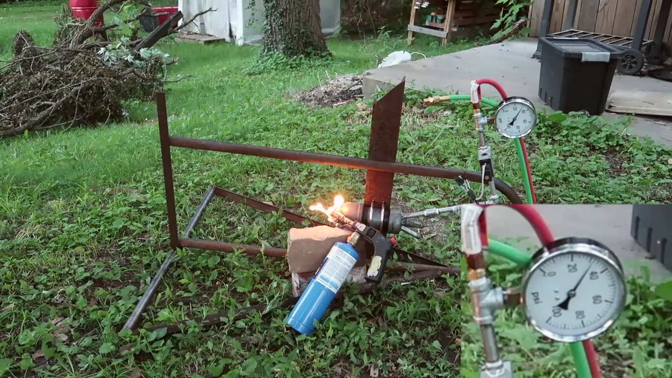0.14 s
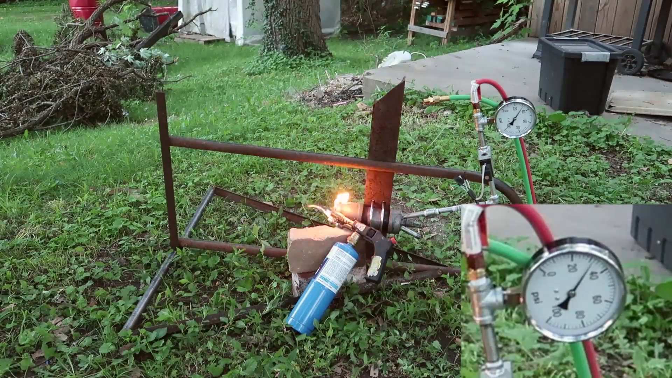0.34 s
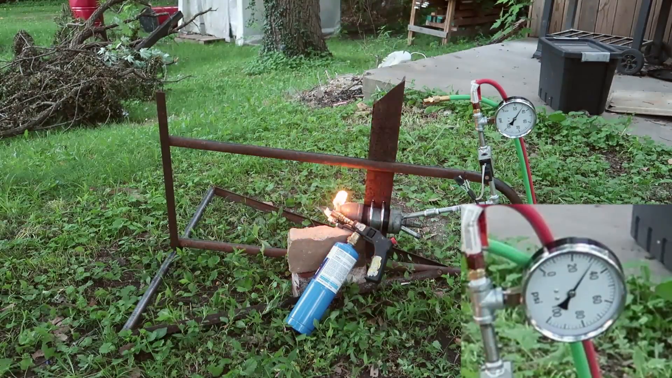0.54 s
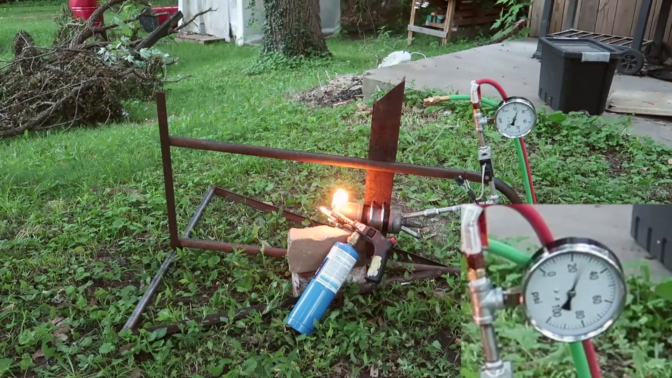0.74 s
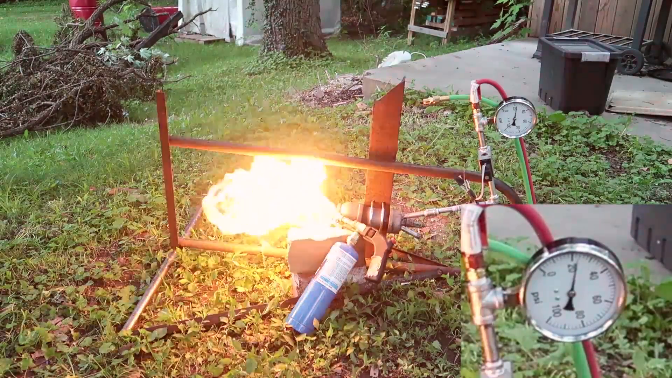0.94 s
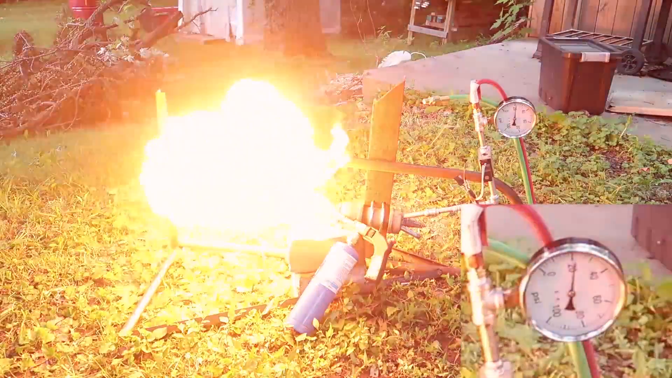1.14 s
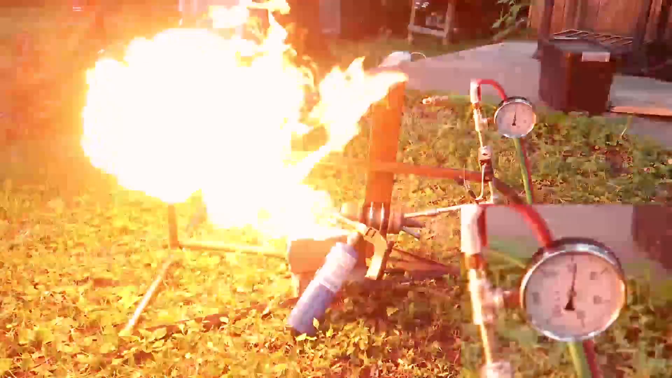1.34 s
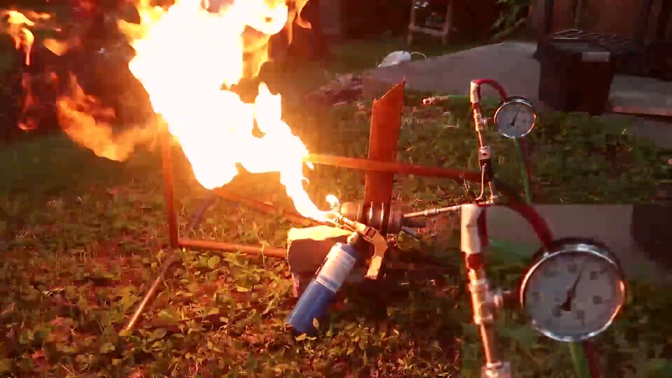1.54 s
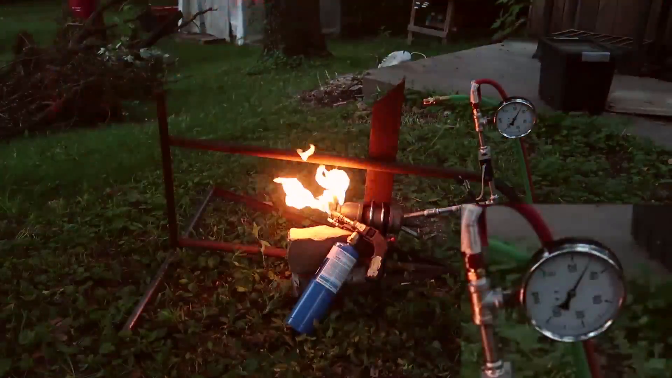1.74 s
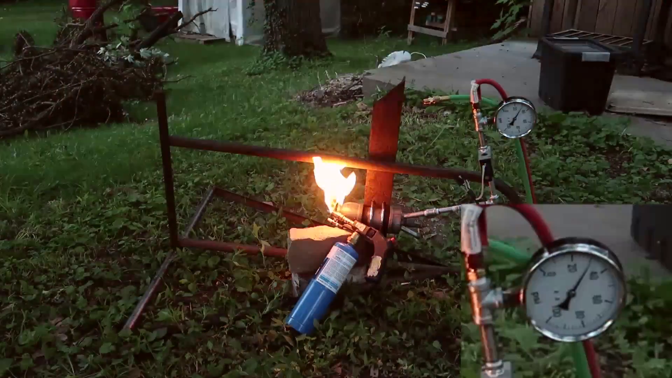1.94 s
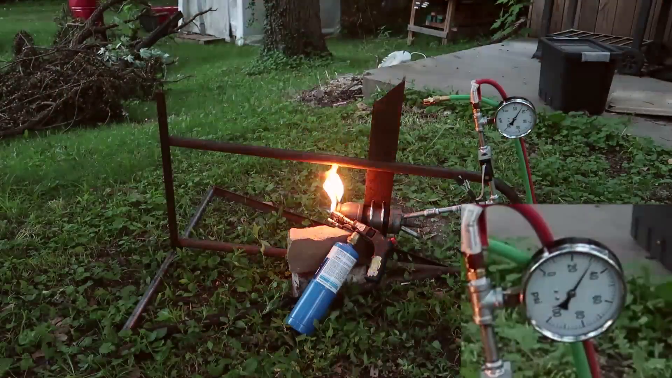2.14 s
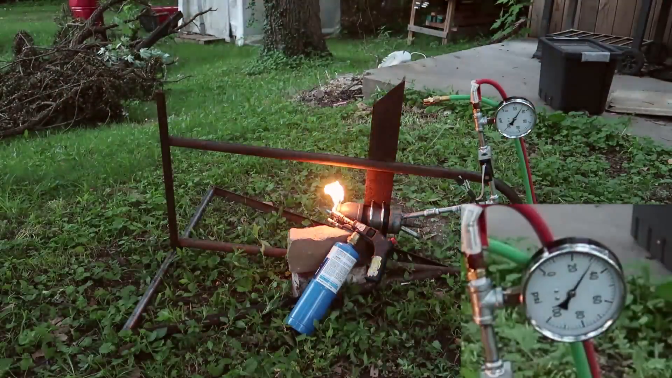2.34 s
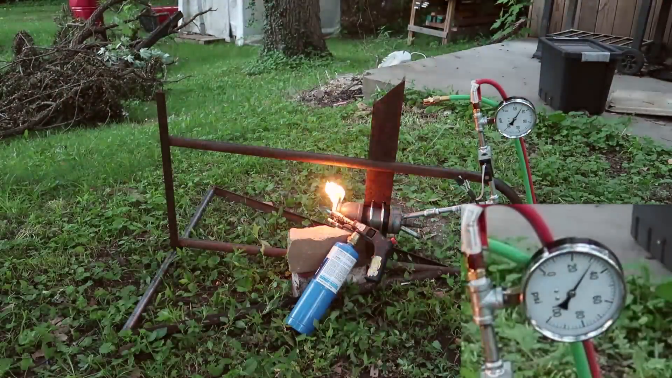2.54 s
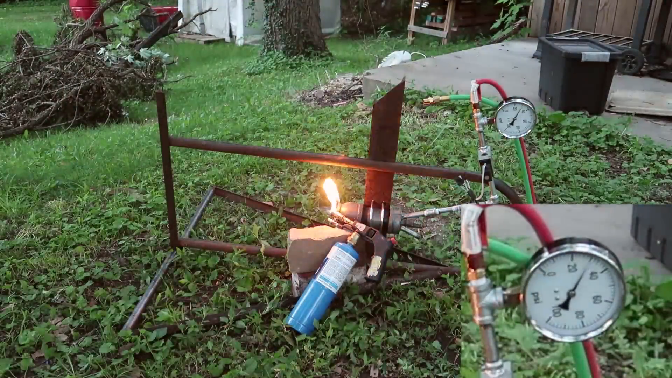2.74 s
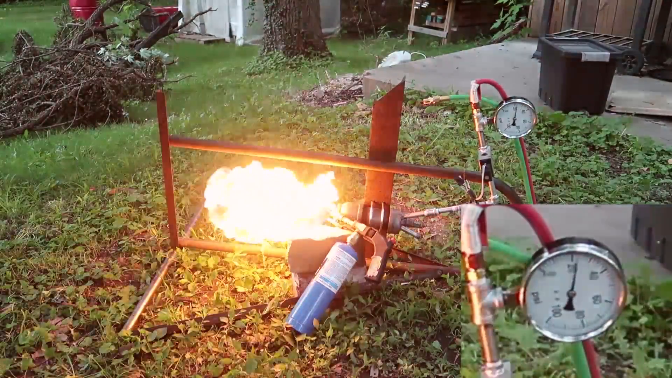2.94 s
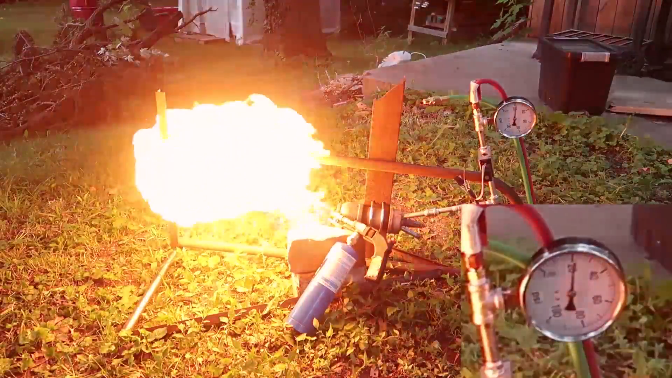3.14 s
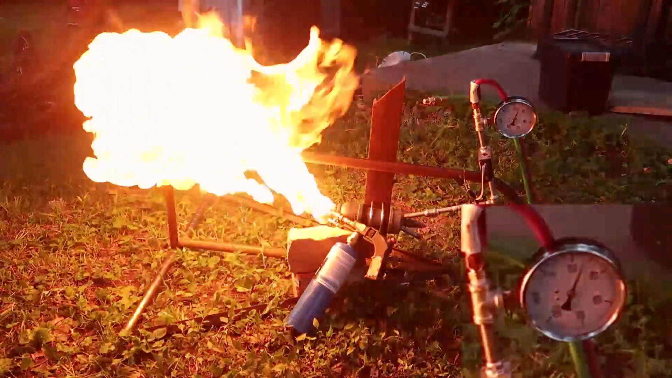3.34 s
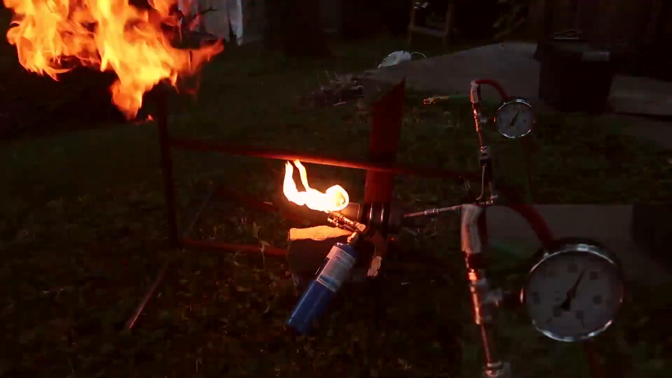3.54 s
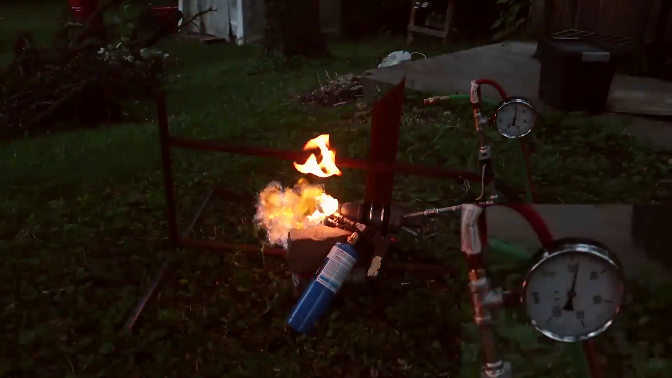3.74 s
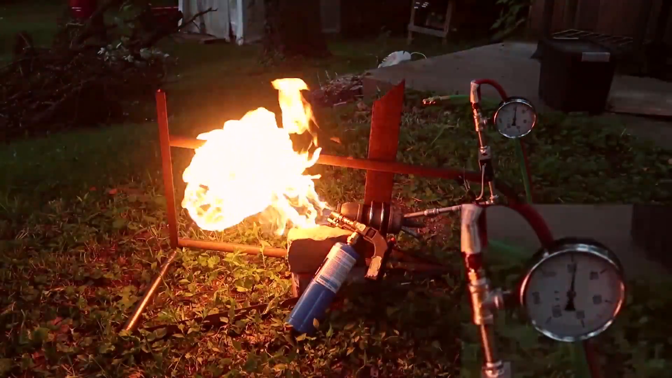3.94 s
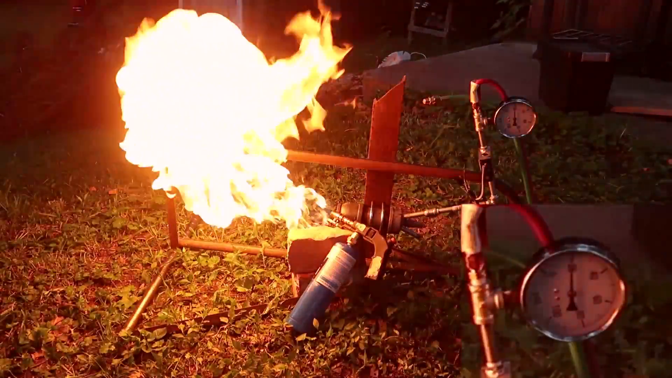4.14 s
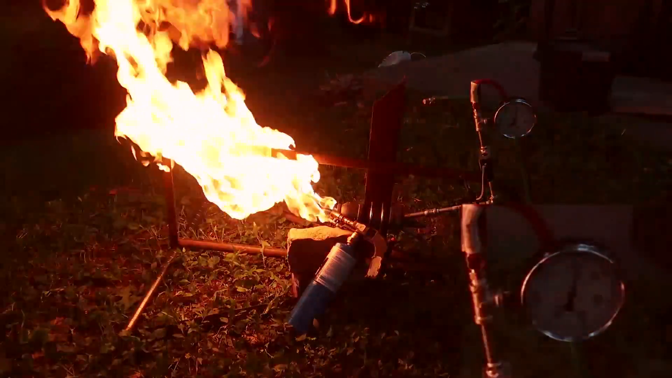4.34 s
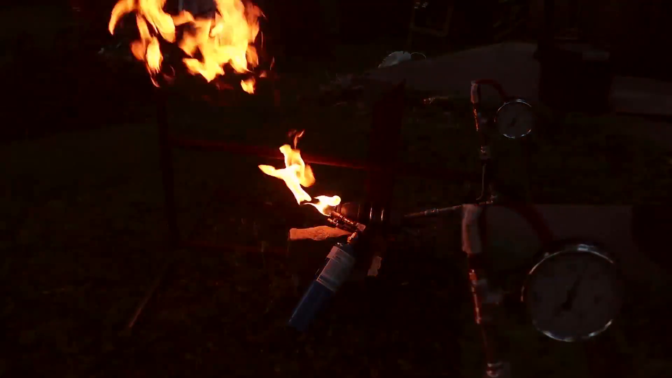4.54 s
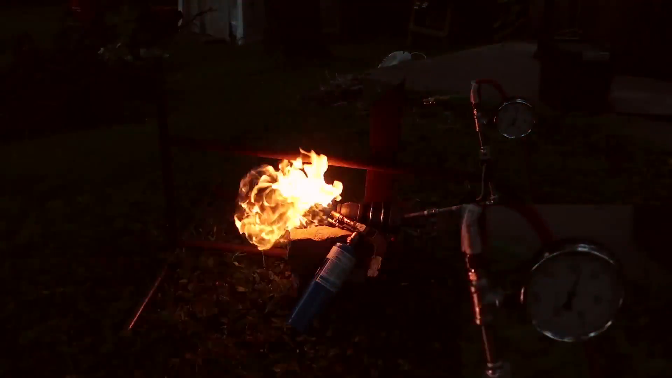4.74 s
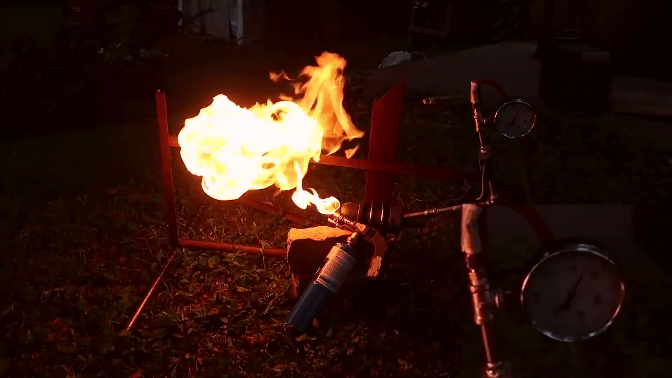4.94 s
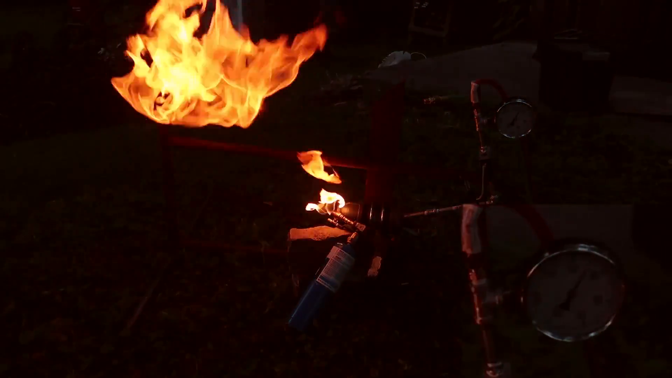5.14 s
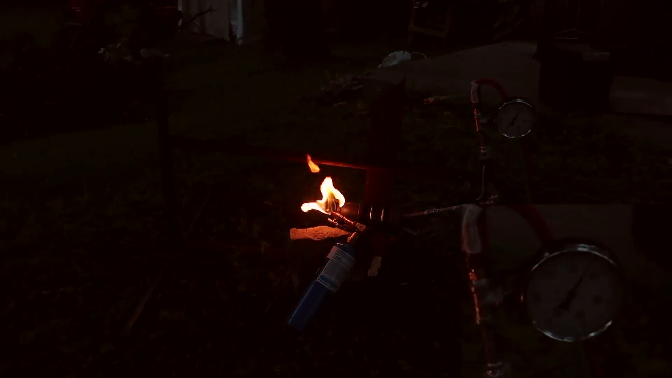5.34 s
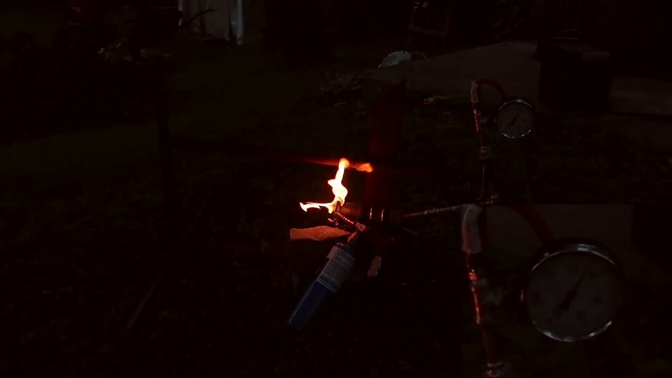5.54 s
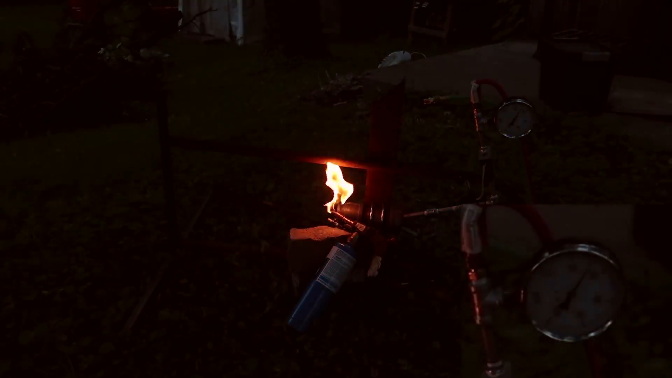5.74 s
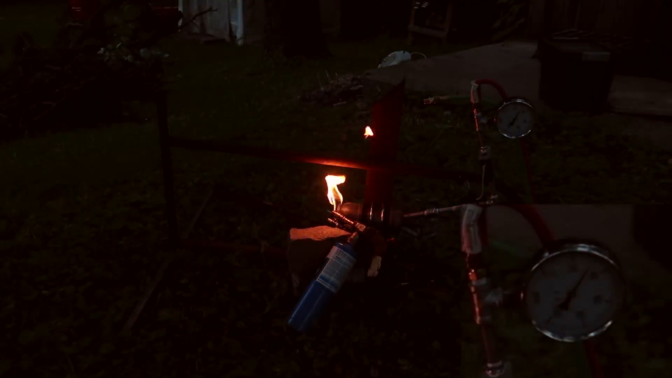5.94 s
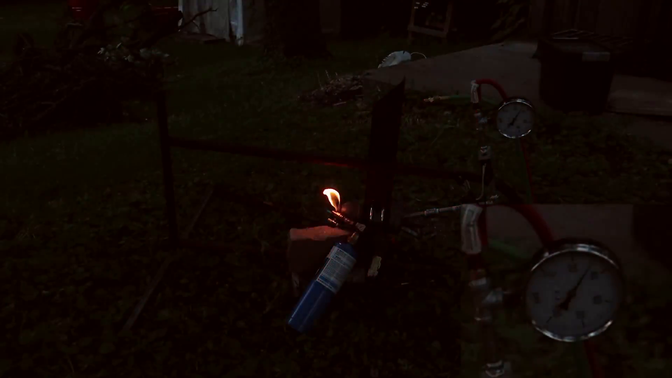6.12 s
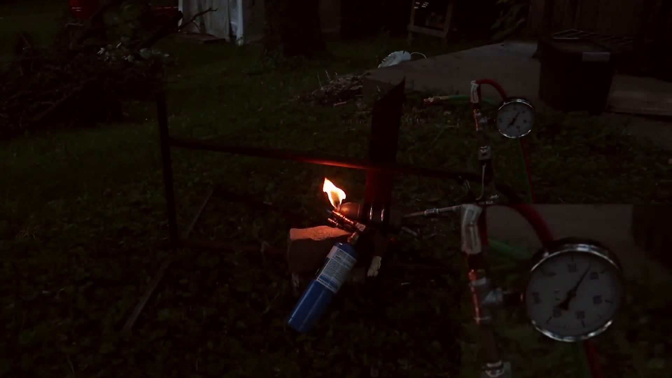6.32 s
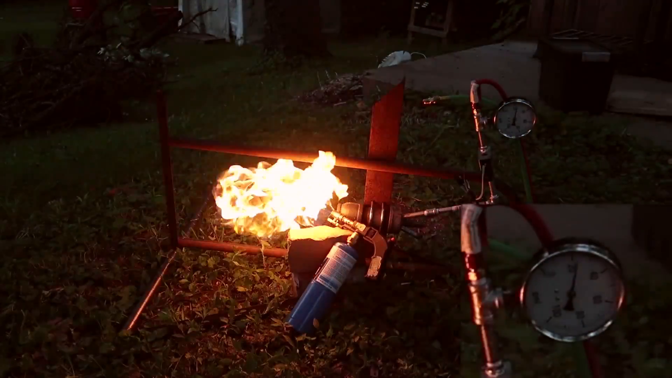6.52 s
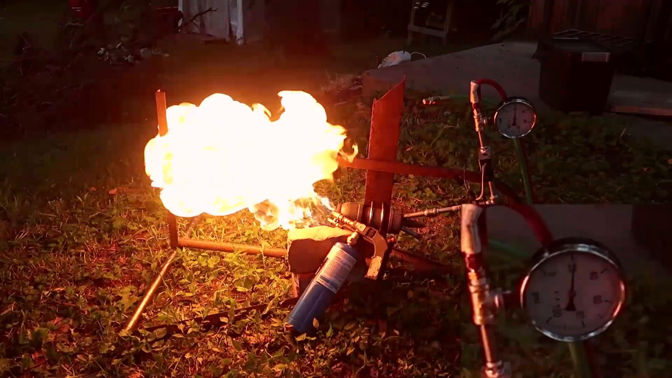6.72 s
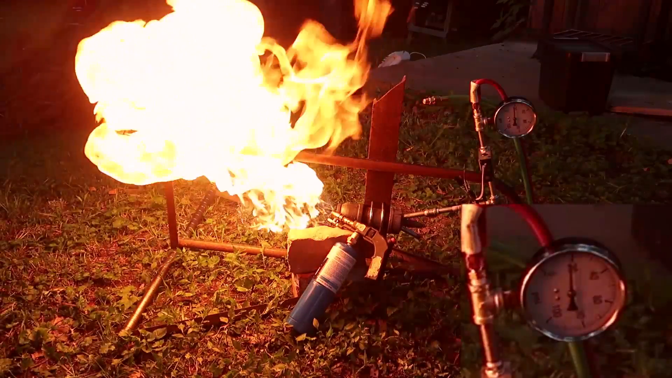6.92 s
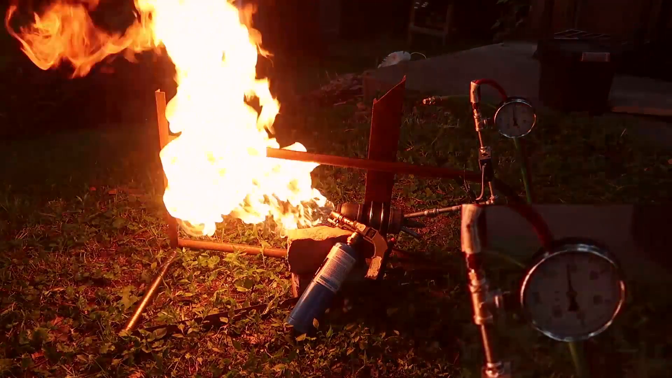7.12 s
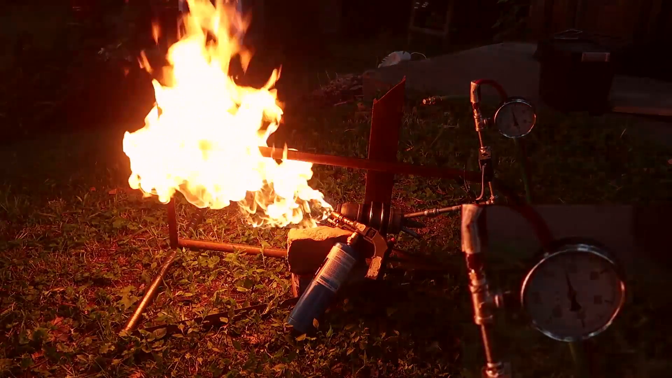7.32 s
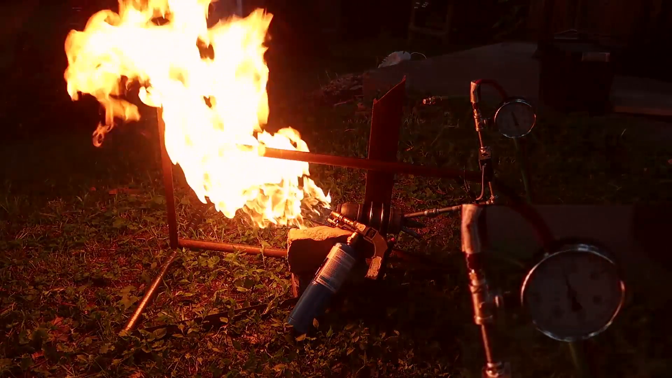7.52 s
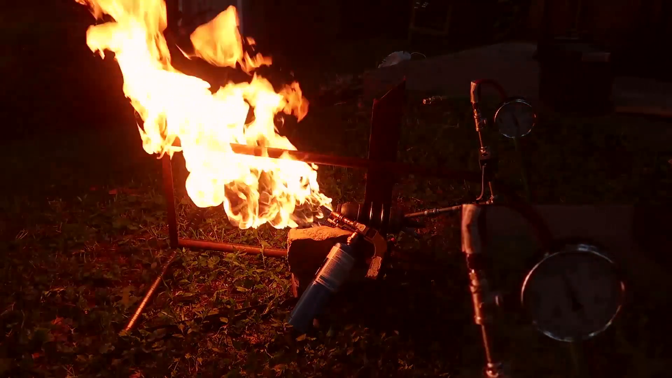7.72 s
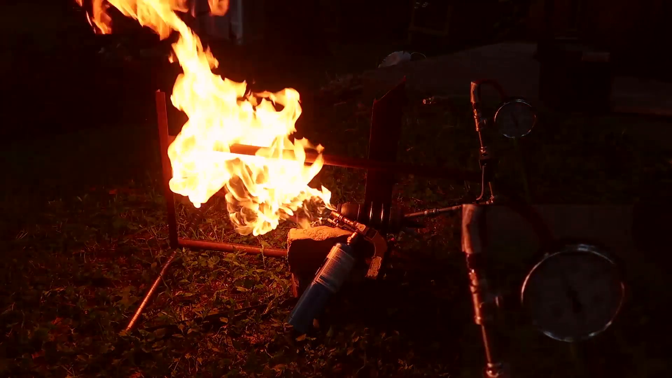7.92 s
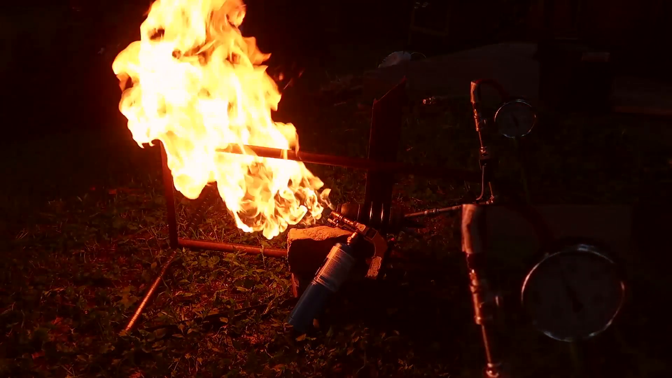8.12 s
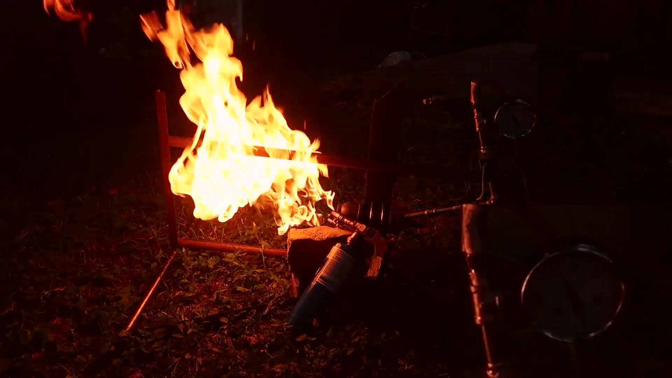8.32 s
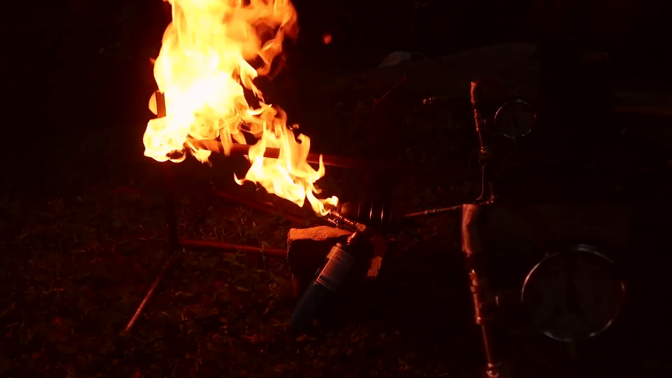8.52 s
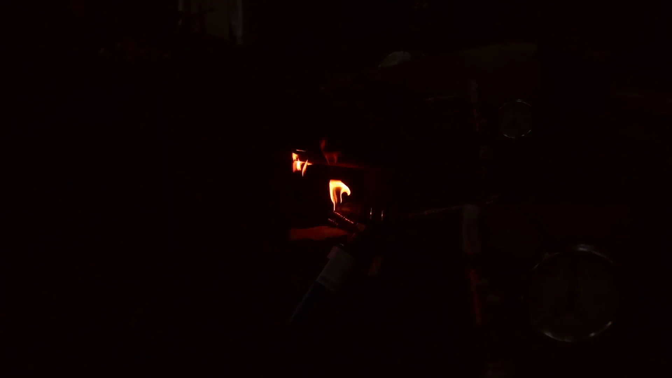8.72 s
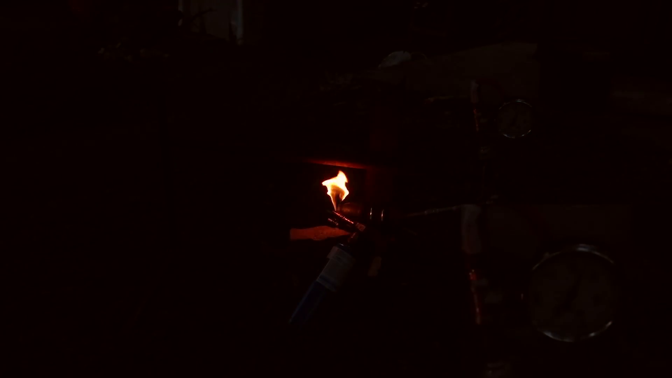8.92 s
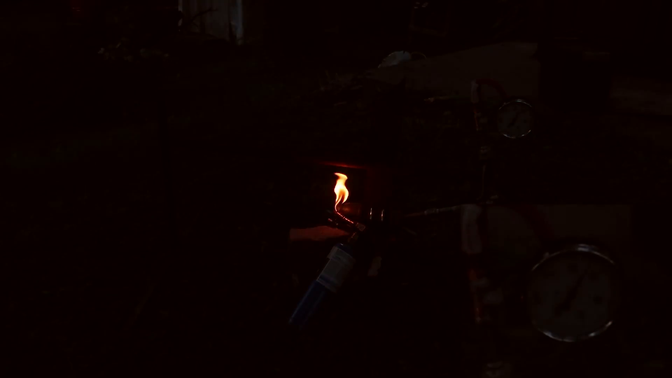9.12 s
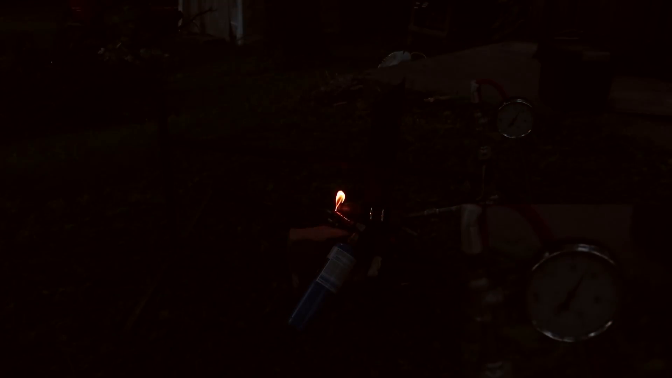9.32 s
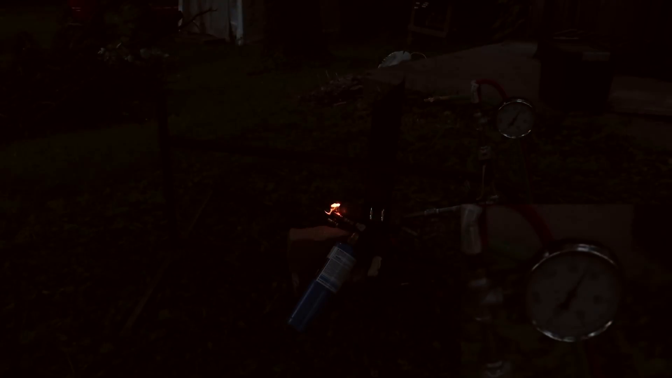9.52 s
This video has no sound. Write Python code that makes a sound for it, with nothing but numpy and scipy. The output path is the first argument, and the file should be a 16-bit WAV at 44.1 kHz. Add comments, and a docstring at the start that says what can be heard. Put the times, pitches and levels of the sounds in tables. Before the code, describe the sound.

A valve clicks and releases five shrill, hissing gas jets that boom into roaring fireballs, each ending in a loud pop, with faint birds around.

```python
"""A solenoid valve lets five bursts of propane, the fourth very short, through a pipe past a pilot flame in a yard.
First the pilot flame flutters in open air while birds whistle and a thin whine sounds far away.
In each burst the valve clicks as struck modes, and turbulent noise hisses and drives the pipe's resonances.
Then the cloud ignites with a boom of low noise and roars; when the valve shuts, a rising chirp makes the pop.
Near the end insects trill and a light knock falls; scattered echoes follow the sounds of the rig and the wildlife."""
import sys
import numpy as np
from scipy import signal
from scipy.fft import rfft, irfft
from scipy.io import wavfile
from scipy.ndimage import uniform_filter1d

SR = 44100
rng = np.random.default_rng(int(sys.argv[2]) if len(sys.argv) > 2 else 0)


def wrap_up_sound(samples):
    """Save the sound to the file named by the first command line argument, as 16-bit audio."""
    columns = np.atleast_2d(samples).T
    # keep every value between -1 and 1, then stretch to whole-number steps
    tamed = np.clip(columns, -1, 1)
    steps = np.round(tamed * 32767).astype(np.int16)
    wavfile.write(sys.argv[1], SR, steps)


N = 426447
TIME = np.arange(N) / SR

# Bursts of gas. Each row: valve opening in seconds, click level in dB, jet level in dB, boom level in dB,
# delay to ignition in seconds, starting pitch of the main whistle in Hz, time to fill the pipe in seconds.
BURSTS = [(0.8316, -28, -30, -24.5, 0.14, 1908, .22), (2.8387, -24.5, -29, -20, .13, 1866, 0.29),
          (3.7485, -25, -30, -21, 0.12, 1838, 0.25), (4.6808, -25.5, -29.5, -22.5, 0.12, 1858, .2),
          (6.4309, -25.5, -29.5, -21.5, 0.13, 1868, .19)]
OPEN_S, CLICK_DB, JET_DB, BOOM_DB, IGNITE_S, START_HZ, FILL_S = np.transpose(BURSTS)
# Closings of the valve. Each row: time in seconds, peak level of the pop's push in dB.
SHUTS = [(1.411, -3), (3.2767, -3), (4.2971, -4), (4.8021, -3.5), (8.4675, -5.5)]
# Humming modes of the gas-filled pipe. Each row: frequency in Hz, width in Hz, relative level in dB.
PIPE_MODES = [(354, 31.6, -1), (830, 217, -5.5), (2338, 59, -17.5), (3010, 170, -12), (4265, 67, -6.5),
              (6750, 43, -21)]
# The two microphone ports, for sound from the rig and for sound from all around.
# Each row: frequency in Hz, correlation of the ports (-1 to 1), phase lead of the left in radians.
NEAR_PORTS = [(100, 1, 0), (3000, 1, 0), (3600, .93, -.1), (4600, .92, -.1), (5300, .76, -.5),
              (8200, .64, -.6), (9700, .55, -1.1), (10900, .55, -3.9), (12700, .68, -4.6),
              (14600, .65, -6.1)]
DIFFUSE_PORTS = [(108, 1, 0), (278, 0.96, 0), (504, 0.65, 0), (870, 0.87, 0), (1600, 0.69, 0),
                 (3000, 0.56, 0), (4900, 0.16, 0), (5230, -0.64, 0), (7000, -0.94, 0), (8500, -0.64, 0),
                 (11000, -0.66, 0)]


def jet(flutter_db=0.87, front_db=-19, front_delay=0.021, front_t60=0.025):
    """Impulse and flow excitation: a gas front thumps the lowest pipe mode; then the jet hisses and the pipe sings."""
    front = np.zeros(N)
    t = np.arange(SR // 10) / SR
    lowest_hz = PIPE_MODES[0][0]
    for s in OPEN_S:
        add(front, s + front_delay, ring([(lowest_hz, front_db, front_t60)], t))
    burst = line()[0]
    level_db = JET_DB[burst] + flutter_db * wander(23)
    return front + amp(level_db) * (song() + hiss())


def song(hum_db=-2.1, hum_per_db=0.25, steeper=0.38, flutter_db=1.0, waver=0.00488):
    """Pipe resonance: modes sink as heavy, cold gas slows sound in the pipe; among the hums, higher modes fade more."""
    # Whistling modes. Each row: frequency in Hz, width in Hz, relative level in dB.
    whistles = [(1028, 50, 0.046), (1793, 44, 0.071), (2783, 60, -1.36), (3516, 73, 0.65)]
    # Answer of each whistle to the jet; the second fades most as pressure falls. Each row: relative level
    # at first in dB, relative level with the pipe full in dB, dB per dB of line pressure.
    voicing = [(-.5, 0, 0.58), (-3.5, -0.5, 1.7), (0, -5.5, 0.65), (-5.5, -3, 1.04)]
    # Swells of the whistles. Each row: centre in seconds, length in seconds, number of the whistle, gain in dB.
    # The number is rounded; only 0 to 3 name a whistle, and other rows sound nothing.
    surges = [(1.01, 0.14, 3, 7.5), (1.033, 0.2, 2, 6), (2.88, 0.076, 0, 4), (2.893, 0.068, 3, 6.5),
              (2.915, .06, 3.5, 9), (3.113, 0.12, 2.5, 5.5), (4.118, 0.074, 1, 6), (4.244, .14, 3, 8),
              (4.774, .07, 5, 12), (6.513, 0.068, 1.5, 5), (6.698, .12, 2.5, 4), (6.997, 0.13, 7, 0),
              (7.21, 0.097, 3.5, 8.5), (7.26, 0.16, 2, 2.5), (7.305, 0.043, 0.5, 6), (7.49, .5, 0, 5),
              (7.82, 0.087, 3, 5), (7.973, 0.37, 3, 8.5), (7.98, 0.41, 2, 7)]
    rest_hz = 1793  # pitch at which the modes have their listed frequencies
    full_hz, climb_hz_per_db = 1764.6, 8.5  # pitch with the pipe full, and its climb as the pressure sags
    falter_db, falter_after_s, falter_s = -2, 0.047, 0.098  # the disturbed jet dips just after ignition
    accent_db, accent_at_s, accent_s = 1.5, 0.037, 0.017  # brief accent as gas first reaches the mouth

    burst, age, pressure = line()
    air = np.exp(-(age / FILL_S[burst]) ** 2)  # share of air left in the pipe
    pitch = full_hz + air * (START_HZ[burst] - full_hz) - climb_hz_per_db * np.minimum(pressure, 0)
    sound_speed = pitch / rest_hz * (1 + waver * wander(25.1))  # relative to the speed at rest_hz
    out = np.zeros(N)
    for hz, width, db in PIPE_MODES:
        answer_db = hum_per_db * (hz / full_hz) ** steeper * pressure
        out += amp(hum_db + db + answer_db) * sing(hz * sound_speed, width)
    # four modes lock to the jet's eddies and whistle
    for k, ((hz, width, db), (first_db, full_db, per_db)) in enumerate(zip(whistles, voicing)):
        surge = sum(gain * bump(s, length) for s, length, which, gain in surges if round(which) == k)
        filling_db = air * first_db + (1 - air) * full_db
        strength = filling_db + per_db * pressure + surge + flutter_db * wander(7.5)
        out += amp(db + strength) * sing(hz * sound_speed, width)
    falter = falter_db * bump((OPEN_S + IGNITE_S)[burst] + falter_after_s, falter_s)
    accent = accent_db * bump(OPEN_S[burst] + accent_at_s, accent_s)
    return flow(delay=0.021, rise=0.014, drain=0.026) * amp(accent + falter) * out


def hiss(hiss_db=3.0, body_per_db=0.56, fizz_per_db=1.13, split_hz=3500):
    """Jet turbulence at the nozzle: the high band falls faster with pressure, so the hiss grows duller."""
    # Spectrum of the hiss. Each row: frequency in Hz, relative level in dB.
    hiss_spectrum = [(300, -62), (600, -5.5), (900, -4), (1400, -14.5), (2100, -7), (2550, -5),
                     (3100, -0.5), (3850, -4), (4650, -2), (5100, -1), (8000, -4.5), (8800, -7.5),
                     (10500, -9.5), (12200, -8), (15000, -18.5), (16500, -32)]
    # Flares of the high band. Each row: centre in seconds, length in seconds, gain in dB.
    flares = [(2.89, 0.076, 3), (3.93, 0.085, 4), (4.158, 0.19, 6.5), (7.07, 0.1, 1)]
    pressure = line()[2]
    rush = noise(hiss_spectrum, patchy_db=3.0, size=2048)
    body = signal.sosfiltfilt(signal.butter(1, split_hz, fs=SR, output="sos"), rush)
    fizz = rush - body
    flare = sum(gain * bump(s, length) for s, length, gain in flares)
    bands = amp(body_per_db * pressure) * body + amp(fizz_per_db * pressure + flare) * fizz
    return flow(delay=0.014, rise=0.021, drain=0.019) * amp(hiss_db) * bands


def flow(delay, rise, drain, linger=0.0022):
    """Gas transport (times in s): flow builds a moment after opening and drains exponentially after shutting."""
    share = np.zeros(N)
    for on, (off, _) in zip(OPEN_S, SHUTS):
        build = np.clip((TIME - on - delay) / rise, 0, 1)
        share += build * np.exp(-np.maximum(TIME - off - linger, 0) / drain)
    return share


def line():
    """Supply pressure drop: gives the latest burst, time since it opened in s, and line pressure in dB."""
    # Line pressure, alike in every burst. Each row: time since opening in seconds, pressure in dB.
    sag = [(.06, 1), (.3, 0), (.78, -0.78), (1.15, -5.5), (1.68, -7.5), (2.0, -5)]
    burst = np.maximum(np.searchsorted(OPEN_S, TIME) - 1, 0)
    age = np.maximum(TIME - OPEN_S[burst], 0)
    return burst, age, np.interp(age, *np.transpose(sag))


def fireballs(roar_db=-28.5, roar_per_db=0.2, flutter_db=1.4, flash_db=5.5, flash_s=0.15,
              boom_rise_s=0.056, boom_fall_s=0.09, rumble_db=-41, rumble_fade_db_per_s=22):
    """Combustion noise: burning gas roars, sudden expansion at ignition booms, and the rising cloud rumbles on."""
    # Spectra of the roar and of the boom and rumble. Each row: frequency in Hz, relative level in dB.
    roar_spectrum = [(15, -13), (35, -8), (60, 1), (100, 1.5), (200, 1.5), (300, -0.5), (420, -8.5),
                     (560, -29), (1200, -25), (4000, -53)]
    boom_spectrum = [(15, -30), (30, -9), (45, 0.5), (70, 1), (110, -4.5), (200, -6), (300, -20),
                     (600, -28), (2000, -70)]
    catch_s, burn_out_db_per_s = 0.048, 144  # build-up from valve opening, decay from valve shutting
    burst, age, pressure = line()
    ignition = (OPEN_S + IGNITE_S)[burst]
    since_shut = np.maximum(TIME - np.array(SHUTS)[burst, 0], 0)
    lit = 1 - np.exp(-age / catch_s)
    level = roar_db + roar_per_db * pressure + flash_db * bump(ignition, flash_s) + flutter_db * wander(27)
    roar = lit * amp(level - burn_out_db_per_s * since_shut) * noise(roar_spectrum, patchy_db=2.0, size=2048)
    boom_length = np.where(TIME < ignition, boom_rise_s, boom_fall_s)
    boom = amp(BOOM_DB[burst]) * bump(ignition, boom_length)
    rumble = lit * amp(rumble_db - rumble_fade_db_per_s * since_shut)
    return roar + (boom + rumble) * noise(boom_spectrum, patchy_db=0.5, size=4096)


def pops(start_hz=190, end_hz=965, glide_s=.0018, crest_s=0.0023, width_s=0.0011, ring_db=-4.0,
         ring_t60=0.065, puff_t60=0.022, puff_db=-14.5, right_db=1.0):
    """Flashback: as the gas stops the flame snaps back, a puff and a push that quickens into the pipe's ringing."""
    # Spectrum of the puff. Each row: frequency in Hz, relative level in dB.
    puff_spectrum = [(80, -20), (250, -20), (600, -2), (1200, -6), (1800, 3), (2500, -25), (4500, -6),
                     (9000, -32), (15000, -45)]
    push = np.zeros(N)
    t = np.arange(SR // 6) / SR
    crest = np.exp(-((t - crest_s) / width_s) ** 2)
    ringing = amp(ring_db - 60 * t / ring_t60) * (1 - np.exp(-t / crest_s))
    swell = crest + ringing
    hz = end_hz + (start_hz - end_hz) * np.exp(-(t / glide_s) ** 2)
    for s, db in SHUTS:
        add(push, s, amp(db) * swell / swell.max() * np.sin(2 * np.pi * np.cumsum(hz) / SR))
    puff = amp(puff_db) * noise(puff_spectrum, patchy_db=1.5, size=256, ports=DIFFUSE_PORTS)
    # the right is raised and the left lowered by right_db
    return (push + blows(SHUTS, puff_t60) * puff) * amp([[-right_db], [right_db]])


def valve(tick_t60=0.058, ring_db=-4.5):
    """Modal impact: the plunger snaps open and strikes a dry metal click from the valve body."""
    # Ringing of the valve body. Each row: frequency in Hz, relative level in dB, 60 dB decay time in seconds.
    plunger_modes = [(2850, -10, .02), (3480, 1.5, 0.035), (3670, -1, 0.0091), (5070, -13, 0.014)]
    # Spectrum of the click. Each row: frequency in Hz, relative level in dB.
    click_spectrum = [(500, -30), (1500, -11), (2200, -6), (3000, -10), (3600, 9), (4400, 0), (5200, 1),
                      (6400, -5), (8000, -22), (15000, -29)]
    body = np.zeros(N)
    t = np.arange(SR // 10) / SR
    for s, db in zip(OPEN_S, CLICK_DB):
        add(body, s, amp(db + ring_db) * ring(plunger_modes, t))
    tick = blows(zip(OPEN_S, CLICK_DB), tick_t60) * noise(click_spectrum, patchy_db=2.0, size=256)
    return body + tick


def knock(t60=0.015):
    """Damped impact: a light, dry knock on the rig, as a short burst of shaped noise."""
    # Knocks on the rig. Each row: time in seconds, level in dB.
    knocks = [(9.644, -24)]
    # Spectrum of the knock. Each row: frequency in Hz, relative level in dB.
    knock_spectrum = [(300, -25.5), (1000, -14), (1600, 6), (2200, -9), (3000, 7), (3900, -1), (5000, -12),
                      (7000, -22), (15000, -47)]
    return blows(knocks, t60) * noise(knock_spectrum, patchy_db=0.0, size=256)


def wildlife(quaver=0.0075, whine_hz=2640, whine_waver_hz=7, whine_db=-62.5):
    """Frequency modulation and narrow-band noise: birds glide and quaver, insects sound unevenly over a thin whine."""
    # Levels here are those ahead of the direct and echoed paths.
    # Bird notes. Each row: start in seconds, length in seconds, start and end pitch in Hz, level in dB.
    birds = [(0.155, 0.076, 3435, 3420, -55.5), (0.754, 0.047, 3230, 2550, -47.5),
             (1.845, 0.054, 3930, 3220, -43), (1.888, 0.096, 2990, 2420, -47), (1.89, .06, 4300, 4250, -57),
             (3.661, 0.068, 3450, 3770, -44.5), (4.43, 0.062, 3380, 3250, -52),
             (4.977, 0.046, 4100, 3570, -49), (5.016, 0.086, 2770, 2710, -49.5),
             (5.124, 0.079, 3000, 3010, -48.5), (5.395, 0.029, 3440, 3400, -52),
             (5.845, 0.059, 3080, 2990, -47.5), (5.874, 0.057, 2880, 2460, -49),
             (8.69, 0.14, 3650, 3470, -48)]
    # Insects. Each row: start and end in seconds, frequency in Hz, width in Hz, level in dB, rms unevenness in dB.
    insects = [(8.85, 9.7, 2690, 130, -57.5, 4), (8.95, 9.7, 4630, 150, -67.5, 2),
               (0, .85, 9830, 30, -78, 1), (5.15, 6.45, 9830, 30, -76, 1)]
    out = np.zeros(N)
    drift = 1 + quaver * wander(90)
    for s, length, start_hz, end_hz, db in birds:
        u = np.linspace(0, 1, round(length * SR))
        glide = start_hz + (end_hz - start_hz) * np.sin(np.pi * u / 2) ** 2
        hz = glide * drift[round(s * SR):][:len(u)]
        envelope = signal.windows.tukey(len(u), .5)
        add(out, s, amp(db) * envelope * np.sin(2 * np.pi * np.cumsum(hz) / SR))
    for start, end, hz, width, db, trill_db in insects:
        fade = np.clip(np.minimum(TIME - start, end - TIME) / 0.032, 0, 1)
        out += amp(db + trill_db * wander(14)) * fade * sing(hz, width)
    whine_curve = whine_hz + whine_waver_hz * wander(20)
    return out + amp(whine_db) * np.sin(2 * np.pi * np.cumsum(whine_curve) / SR)


def background(pilot_db=-43.5, flutter_db=0.5, air_db=-46.5):
    """Diffuse noise field: a fluttering pilot flame under steady outdoor air and a wide, thin hiss."""
    # Spectra of the pilot flame and the air. Each row: frequency in Hz, relative level in dB.
    pilot_spectrum = [(15, -34), (35, -19.5), (58, 2), (80, -4), (105, 3), (160, -6.5), (250, -5.5),
                      (450, -16.5), (1000, -57), (4000, -70)]
    air_spectrum = [(100, -1.5), (450, -4), (800, 2), (1000, -2.5), (1300, -8.5), (2100, -11),
                    (3200, -13.5), (4400, -15.5), (5200, -16), (5800, -8.5), (6600, -6.5), (7200, -18),
                    (9000, -28), (10500, -29), (15000, -41)]
    level_db = pilot_db + flutter_db * wander(9)
    pilot = amp(level_db) * noise(pilot_spectrum, patchy_db=1.0, size=4096, ports=DIFFUSE_PORTS)
    return pilot + amp(air_db) * noise(air_spectrum, patchy_db=1.33, ports=DIFFUSE_PORTS)


def yard(x, gap_s=.012, mono_below_hz=3500):
    """Reverberation by convolution: scattered echoes from trees and walls; low tones reach both ports alike."""
    # Decay of the echoes. Each row: frequency in Hz, 60 dB decay time in seconds.
    decay = [(100, 0.23), (1000, 0.31), (3500, 0.5), (8000, 0.52), (15000, 0.5)]
    signs = rng.choice([-1., 1.], (2, SR))
    present = rng.random((2, SR)) < 2500 / SR  # about 2500 echoes a second
    taps = signs * present * (np.arange(SR) > gap_s * SR)
    hz, t, z = signal.stft(taps, SR, nperseg=256)
    same = 1 / (1 + (hz / mono_below_hz) ** 4)
    z[1] = same[:, None] * z[0] + np.sqrt(1 - same ** 2)[:, None] * z[1]
    tail = signal.istft(z * amp(-60 * t / read(decay, hz)[:, None]), SR, nperseg=256)[1]
    return signal.fftconvolve(x[None], tail / np.linalg.norm(tail[0]), axes=1)[:, :N]


def noise(spectrum, patchy_db, size=1024, ports=NEAR_PORTS):
    """Filtered turbulence: shaped noise with drifting patches of loudness, partly coherent at the two ports."""
    hz = np.fft.rfftfreq(size, 1 / SR)
    frames = N // (size // 4) + 5
    a, b, c, d, patches = rng.standard_normal((5, frames, len(hz)))
    patches = uniform_filter1d(patches, size=10, axis=0)  # smooth over time
    patches = unit(uniform_filter1d(patches, size=14, axis=1))  # smooth over frequency
    same = np.clip(read(ports, hz), -1, 1)
    left = a + 1j * b
    right = same * left + np.sqrt(1 - same ** 2) * (c + 1j * d)
    right = right * np.exp(-1j * read(ports, hz, axis=2))
    z = np.array([left, right]) * amp(read(spectrum, hz) + patchy_db * patches)
    sound = signal.istft(z.swapaxes(1, 2), nperseg=size, noverlap=size - size // 4)[1]
    return unit(sound[:, :N])


def sing(hz, width_hz, skirt=4.37):
    """Resonance blown by turbulence: twice-smoothed noise on a carrier makes a fuzzy whistle on the curve hz."""
    slow = rng.standard_normal((2, N))
    for w in (width_hz, width_hz * skirt):
        slow = signal.lfilter([1], [1, -np.exp(-np.pi * w / SR)], slow)
    turn = 2 * np.pi * np.cumsum(hz * np.ones(N)) / SR
    return unit(slow[0] * np.cos(turn) + slow[1] * np.sin(turn))


def ring(modes, t):
    """Modal decay: sines struck at time zero, each slightly detuned from blow to blow."""
    out = np.zeros(len(t))
    for hz, db, t60 in modes:
        detuned_hz = hz * (1 + 0.0081 * rng.standard_normal())
        out += amp(db - 60 * t / t60) * np.sin(2 * np.pi * detuned_hz * t)
    return out


def blows(rows, t60):
    """Impact envelope: sudden blows with a 0.6 ms attack that die away exponentially."""
    out = np.zeros(N)
    for s, db in rows:
        attack = np.clip((TIME - s) / 0.0006, 0, 1)
        out += amp(db - 60 * np.maximum(TIME - s, 0) / t60) * attack
    return out


def bump(s, length):
    """Gaussian envelope: a smooth swell of height one around time s."""
    return np.exp(-(2 * (TIME - s) / length) ** 2)


def wander(rate_hz):
    """Low-passed chance: random drift of rms one, with changes up to about the given rate."""
    size, frame_rate = 2 * 4096, 400
    hz = np.fft.rfftfreq(size, 1 / frame_rate)
    slow = irfft(rfft(rng.standard_normal(size)) / (1 + (hz / rate_hz) ** 4))
    return np.interp(TIME, np.arange(len(slow)) / frame_rate, unit(slow))


def read(points, hz, axis=1):
    """Logarithmic frequency scale: interpolates one column of a table along it."""
    columns = np.transpose(points)
    return np.interp(np.log(hz + 1), np.log(columns[0] + 1), columns[axis])


def add(mix, s, sound):
    """Superposition: adds a sound to the mix at time s."""
    part = mix[round(s * SR):][:len(sound)]
    part += sound[:len(part)]


def unit(x):
    """Power normalization: scales to an rms of one."""
    return x / np.sqrt(np.mean(x ** 2) + 1e-20)


def amp(db):
    """Decibel law: turns a level into an amplitude factor."""
    return 10 ** (np.asarray(db) / 20)


def scene(echo_db=-15.5, far_echo_db=1.0, far_direct_db=-4.5):
    """Direct-to-reverberant ratio: the rig is near and fairly dry; the wildlife is far and mostly echo."""
    rig = jet() + pops() + fireballs() + valve() + knock()
    far = wildlife()
    echoes = yard(amp(echo_db) * rig.mean(0) + amp(far_echo_db) * far)
    return rig + amp(far_direct_db) * far + echoes + background()


def record(dry, low_cut_hz=27, edge_hz=15800):
    """Band limiting and saturation: the microphone sheds deep rumble and rounds high peaks; then the treble ends."""
    sound = signal.sosfilt(signal.butter(2, low_cut_hz, "high", fs=SR, output="sos"), dry)
    sound = sound / (1 + (sound / .85) ** 6) ** (1 / 6)
    low_pass = signal.firwin(511, edge_hz, window=("kaiser", 9), fs=SR)
    return signal.oaconvolve(sound, low_pass[None], "same")


dry = scene()
out = record(dry)
wrap_up_sound(out)
```